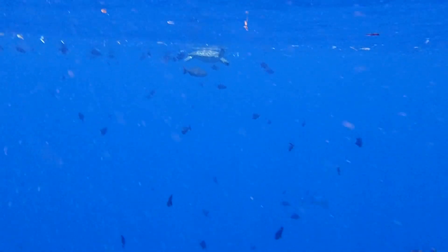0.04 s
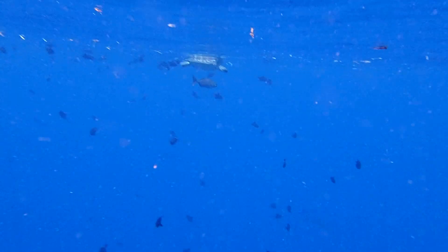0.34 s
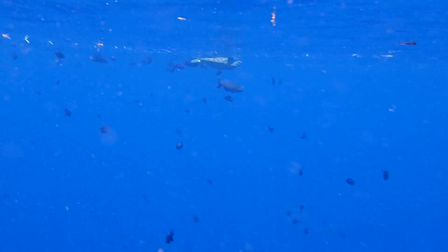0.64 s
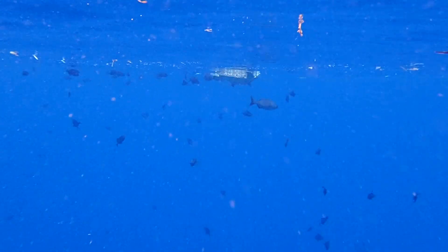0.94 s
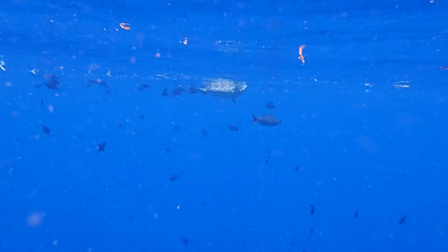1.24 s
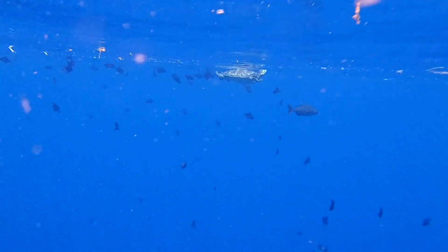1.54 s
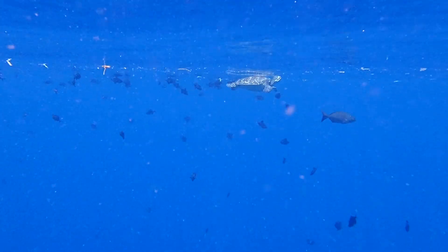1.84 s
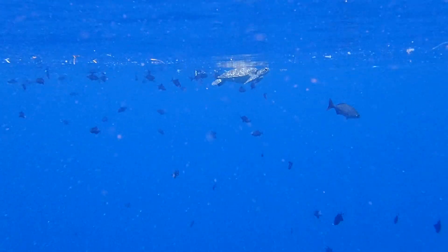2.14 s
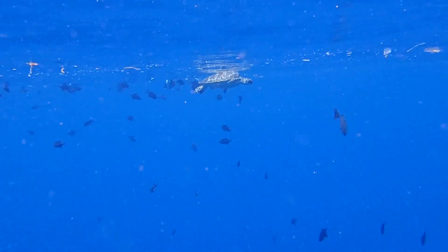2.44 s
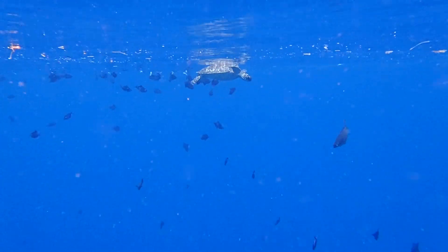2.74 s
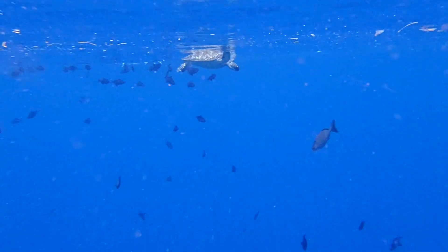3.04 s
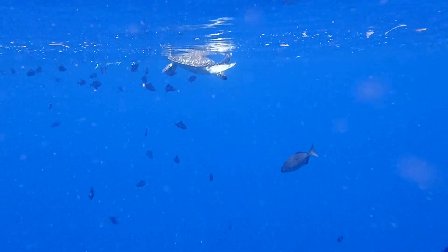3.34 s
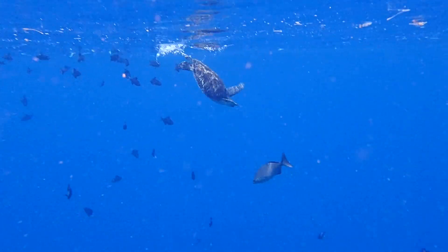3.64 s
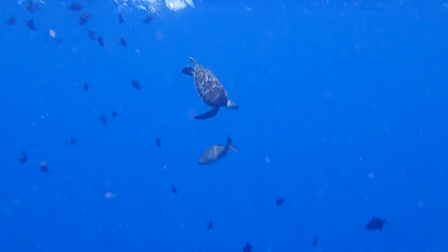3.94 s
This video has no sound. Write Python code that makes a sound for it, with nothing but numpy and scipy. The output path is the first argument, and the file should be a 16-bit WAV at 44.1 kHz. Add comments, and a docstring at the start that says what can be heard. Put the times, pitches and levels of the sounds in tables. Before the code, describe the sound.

Water rumbles and sloshes around a submerged microphone for four seconds, surging between left and right. Dull knocks cluster in the first second, strongest around 0.6 seconds, with small splashes and bubble blips. More thuds and low gulps come from 1.7 to 2.5 seconds and near 3 seconds. A few bubbles blip around 3.4 seconds. Tiny bright crackles and faint gurgling continue throughout.

```python
"""Swell and eddies rumble on the two microphone ports of a camera held just under the open sea.
Each port gets its own push; strong eddies gulp, the housing drones, and the hardest surges knock on it.
Behind that the surface gurgles, wavelets splash and a few bubbles blip, rising in pitch.
On top, tiny snaps ring the housing in bright crackles over a fine fizz."""
import sys
import numpy as np
from scipy import signal
from scipy.fft import rfft, irfft
from scipy.io import wavfile
from scipy.ndimage import uniform_filter1d, minimum_filter1d

SR = 44100
rng = np.random.default_rng(int(sys.argv[2]) if len(sys.argv) > 2 else 0)


def wrap_up_sound(samples):
    """Save the sound to the file named by the first command line argument, as 16-bit audio."""
    columns = np.atleast_2d(samples).T
    # keep every value between -1 and 1, then stretch to whole-number steps
    tamed = np.clip(columns, -1, 1)
    steps = np.round(tamed * 32767).astype(np.int16)
    wavfile.write(sys.argv[1], SR, steps)


N = 176400
T = np.arange(N) / SR

# Levels are relative: each layer adds its own trim. pan_db is left minus right.
# fizz of tiny bubbles: time_s, level_db
FIZZ_RIDE = [(0.07, -62), (0.18, -68.5), (0.4, -71), (0.58, -67), (0.68, -66.5), (0.8, -72), (1.12, -71.5),
             (1.29, -68.5), (1.44, -64), (1.57, -61), (1.64, -55.5), (1.74, -57), (1.83, -66.5),
             (1.97, -69.5), (2.15, -60), (2.33, -68), (2.47, -64), (2.72, -58.5), (2.85, -52),
             (2.99, -64.5), (3.06, -73.5), (3.15, -69), (3.27, -64), (3.43, -54), (3.62, -56), (3.98, -55)]
# the clearest crackles: start_s, level_db
CRACKLE_CUES = [(.0184, -17.5), (.033, -28), (.0707, -36), (.2515, -36), (.269, -37), (.2758, -34),
                (.345, -44), (.3744, -42), (.447, -41.5), (.4978, -33), (.5237, -37), (.6057, -44),
                (.8395, -38), (.8789, -43), (.9595, -32), (1.035, -47), (1.052, -32), (1.1955, -35),
                (1.2466, -40.5), (1.352, -40), (1.3723, -26), (1.429, -32.5), (1.4494, -20.5), (1.47, -37),
                (1.4995, -23), (1.537, -31), (1.573, -29), (1.624, -29.5), (1.707, -21.5), (1.735, -31.5),
                (1.7735, -24), (1.854, -35.5), (1.909, -27), (2.017, -39), (2.042, -38), (2.124, -36),
                (2.224, -33.5), (2.414, -25.5), (2.478, -34.5), (2.485, -31), (2.5565, -32.5), (2.665, -35),
                (2.6834, -23.5), (2.728, -35), (2.751, -34), (2.7975, -24.5), (2.86, -22), (2.8845, -26.5),
                (2.896, -30.5), (2.946, -38), (3.056, -37), (3.224, -34), (3.265, -35), (3.2995, -25.5),
                (3.343, -40), (3.397, -34), (3.406, -28), (3.435, -36), (3.4815, -16), (3.519, -27),
                (3.584, -24), (3.603, -25), (3.625, -32), (3.67, -37), (3.726, -30), (3.737, -31.5),
                (3.744, -39), (3.761, -37), (3.7885, -20), (3.822, -26.5), (3.842, -31), (3.851, -39),
                (3.886, -28), (3.895, -25), (3.911, -23.5), (3.9875, -22)]
# churning of the surface: time_s, level_db
GURGLE_RIDE = [(0.02, -54), (0.1, -60.5), (0.23, -66), (0.33, -64.5), (0.5, -64.5), (0.57, -63),
               (0.69, -64.5), (0.76, -62), (0.85, -56.5), (0.98, -62.5), (1.1, -62.5), (1.38, -59),
               (1.66, -55.5), (1.88, -61.5), (2.09, -58), (2.23, -61), (2.38, -62), (2.6, -62),
               (2.92, -58.5), (3.15, -70.5), (3.27, -59.5), (3.48, -58.5), (3.57, -55), (3.87, -57.5),
               (3.98, -54)]
# single bubbles: start_s, level_db, pitch_hz, pan_db
BUBBLE_CUES = [(.204, -19, 796, -20), (.584, -6, 450, 10), (.634, -15, 850, 4), (0.646, -22, 940, -5),
               (.683, -23, 815, 8), (0.9, -35.5, 1390, 3), (3.316, -38.5, 870, 5), (3.339, -24, 554, 1),
               (3.368, -27, 826, 1), (3.418, -27, 865, 0), (3.443, -9.5, 403, 0), (3.472, -23, 400, 2),
               (3.603, -27.5, 1070, 1), (3.647, -25, 780, 0)]
# wavelets breaking on the housing: start_s, length_s, swish_db, spray_db, pan_db
SPLASH_CUES = [(0.0, 0.054, -37.5, -46.5, 2), (0.204, 0.0069, -38, -42.5, -16),
               (0.597, 0.015, -27.5, -46, 23), (0.636, 0.043, -33, -63, -5), (0.659, 0.017, -38, -58, -4),
               (0.674, 0.034, -38, -53, 5), (0.705, 0.045, -39, -60, 21), (0.769, 0.017, -35, -51.5, 21),
               (0.859, 0.018, -39, -80, 5), (0.901, 0.03, -45, -79, 0), (0.972, 0.066, -45.5, -65, 11),
               (1.434, 0.038, -51, -68, 7), (1.584, 0.034, -44, -62, 6), (2.778, 0.027, -48, -48, 16),
               (2.833, 0.027, -47, -58, 6), (2.967, .025, -41.5, -45, 11), (3.6, 0.035, -44, -47, 5)]
# water knocking on the housing: hit_s, level_db, treble_db, pan_db
KNOCK_CUES = [(0.074, -6, -8, 1), (0.087, -8, -10, -30), (0.127, -0.5, -13, 11), (0.175, -1.5, -12, -21),
              (.207, -9, -18.5, -17.5), (0.258, -8, -30, -16.5), (0.316, -13, -28, -18),
              (.388, -13, -9.5, 34.5), (0.515, -8.5, -30, -20), (0.5535, 4, -6, -27), (0.608, -4, -26, 24),
              (0.6523, -11, -9, 11), (.663, 0, -13, 19), (0.6901, 2, -25, -11), (0.708, 1, -36, 27),
              (0.776, -9.5, -33.5, 26), (0.976, -11.5, -19.5, 16), (.998, -13.5, -26, 15),
              (1.009, -14.5, -27, 6.5), (1.124, -22, -7, 6.5), (1.721, -7, -14, 3.5), (1.737, -11.5, -5, 8),
              (1.763, -11.5, -14, -5), (1.7933, -10.5, -16, 15), (1.836, -16, -9, 33),
              (1.856, -15.5, -4.5, 31), (1.937, -15.5, -9, 14), (1.961, -7, -11, 35),
              (2.2038, -5.5, -15, -6), (2.213, -13, -6.5, 0), (2.2444, -11, -9.5, -21),
              (2.2526, -9, -14, -15), (2.269, -10.5, -10, -33.5), (2.5247, -9.5, -11.5, 28.5),
              (2.8609, -6, -11.5, 12), (2.868, -16, -12, 4), (2.9273, -9, -9, 22), (2.9963, -8, -11, 21.5),
              (3.002, -13, -5, 9.5), (3.034, -14.5, -12, 9), (3.0444, -9.5, -8, 10.5),
              (3.073, -6.5, -14, -24.5), (3.623, -16, -9, 14), (3.75, -9.5, -15, 29), (3.789, -16, -5, 14),
              (3.979, -4.5, -6, 3)]
# single strong eddies: start_s, length_s, first_hz, last_hz, level_db, pan_db
GULP_CUES = [(.035, 0.059, 145.5, 188.5, -5.5, -3.5), (.11, 0.13, 256, 167, -14, -2),
             (.36, 0.08, 191.3, 174, -8, 5), (.62, 0.065, 371.5, 337, -10.5, 13.5),
             (.93, 0.084, 269, 286, -10.5, -6.5), (1.1, 0.055, 175, 165, -15, -5.5),
             (1.67, 0.19, 88.8, 65.5, -11, 1), (2.13, 0.099, 107.3, 79, -9, 12),
             (2.228, 0.033, 135, 160, -11.5, 5), (2.24, 0.042, 293.7, 315, -4.5, -24),
             (2.265, 0.055, 436, 252, -13, -14), (2.31, 0.044, 224, 188, -10.5, 18),
             (2.362, 0.035, 173, 149, -8, 14), (2.49, 0.098, 146.3, 120, -10, 15.5),
             (2.829, 0.12, 58.3, 81.9, -3.5, -0.5), (2.96, 0.14, 213.8, 212.8, -11.5, 12.5),
             (3.272, 0.025, 189, 200, -16.5, 17), (3.53, 0.19, 50, 53, -9, -3.5)]
# housing drone, sloshing eddies and slow push of the swell: time_s, level_db, pan_db
HOLLOW_RIDE = [(0.0, -29, -7), (0.1, -32.5, 1), (0.12, -18.5, 19), (0.19, -30.5, -1), (0.3, -23, 9.5),
               (0.36, -31, -12.5), (0.39, -19, 6), (0.47, -39.5, 8), (0.52, -24.5, -11), (0.57, -26, 11),
               (0.65, -19.5, -1.5), (0.81, -33, 4.5), (1.15, -22, -5), (1.18, -24.5, 7), (1.21, -33, 9),
               (1.25, -24, 0), (1.36, -31, -1), (1.5, -31.5, 4.5), (1.73, -22.5, -2.5), (1.86, -22, 5.5),
               (1.9, -43, -2), (1.94, -23, 11), (2.04, -37, -4), (2.09, -19.5, 6.5), (2.14, -29.5, 14),
               (2.26, -17, -20), (2.34, -37, -3), (2.46, -30.5, -11.5), (2.51, -36.5, -3.5),
               (2.72, -30.5, 16.5), (2.74, -36, -1), (2.83, -23.5, 3.5), (3.0, -27.5, 2), (3.07, -23.5, -8),
               (3.19, -47, 1.5), (3.27, -37, 14), (3.31, -35, 4), (3.73, -21.5, -2.5), (3.91, -40.5, 1.5),
               (4.0, -29.5, -4)]
EDDY_RIDE = [(0.0, -51, -3), (0.04, -24, 6), (0.08, -17, -5), (0.22, -14, -13), (0.34, -27.5, 3.5),
             (0.39, -14.5, 10.5), (0.5, -22.5, -2), (0.56, -14, -44), (0.6, -17, 22), (0.7, -17.5, -8.5),
             (0.78, -21.5, 23), (0.82, -25.5, -16), (0.91, -23.5, 10), (0.96, -18.5, 4), (1.1, -21, -16),
             (1.12, -13, -6), (1.17, -27.5, 21), (1.2, -20, 14), (1.36, -29, -4.5), (1.47, -28, 21),
             (1.56, -24, 7), (1.77, -14.5, 4.5), (1.93, -20.5, 16), (1.96, -16.5, 22), (1.99, -32, 4),
             (2.17, -18.5, 12), (2.21, -18, -10.5), (2.27, -18.5, -11), (2.37, -22, 11.5), (2.44, -27, 7.5),
             (2.53, -14, 19), (2.61, -30.5, 15), (2.7, -17, 18.5), (2.75, -33, 8), (2.99, -14.5, 5.5),
             (3.1, -15, -5.5), (3.135, -32.5, -3.5), (3.2, -34, -9), (3.27, -33.5, 13), (3.35, -31.5, -1),
             (3.68, -17, 2), (3.75, -16.5, 17), (3.92, -34, -14), (3.98, -22.5, 4), (4.0, -23, -6)]
SWELL_RIDE = [(0.0, -9.5, -10), (0.09, -28, -5), (0.19, -22, -18), (0.48, -26, -2), (0.54, -11.5, -21),
              (0.61, -21.5, 1), (0.89, -24.5, 9), (0.98, -15.5, 20.5), (1.07, -22.5, -3.5),
              (1.27, -21.5, 3.5), (1.29, -22.5, 3), (1.38, -21, -11), (1.41, -20, 16), (1.65, -18.5, -7),
              (1.7, -12.5, 13), (1.78, -13, -7), (1.92, -27, 6.5), (1.97, -15, 29), (2.0, -23.5, -1),
              (2.06, -19.5, 12), (2.19, -15, -2.5), (2.29, -29.5, -5), (2.39, -29.5, 1), (2.45, -35, -22),
              (2.51, -16.5, 16.5), (2.58, -24, -1), (2.64, -16.5, 17.5), (2.8, -29, -1.5), (2.86, -11.5, 4),
              (2.9, -24.5, -3), (2.99, -16.5, 22.5), (3.07, -13.5, -16.5), (3.14, -34.5, 10),
              (3.2, -28, 14.5), (3.25, -17.5, 16), (3.4, -26, 3), (3.64, -11, 2), (3.66, -18, -27),
              (3.8, -13.5, 8.5), (3.89, -32.5, -5), (4.0, -7.5, 9.5)]

# EQ of the bright haze, the snaps and the ringing housing: frequency_hz, gain_db
HAZE_EQ = [(2000, -24), (3500, -25.5), (5000, -14.5), (5900, -1), (6600, -1), (7600, -9), (9200, -8.5),
           (10500, -20.5), (16000, -35)]
SNAP_EQ = [(2000, -31), (3800, -27.5), (4800, -11.5), (6500, -3), (8600, -4.5), (9600, -6.5), (10600, -24),
           (16000, -25)]
RING_EQ = [(1500, -63.5), (3500, -37.5), (4400, -15.5), (5000, -11.5), (5800, 3), (6600, 6), (7600, -6),
           (9000, -6.5), (10500, -27), (16000, -29.5)]
# EQ of the churning, the wavelets and the thuds: frequency_hz, gain_db
GURGLE_EQ = [(350, -18.5), (600, -10), (830, 5.5), (1200, -0.5), (1600, -3), (2100, -13), (2800, -31),
             (4000, -33), (8000, -57.5)]
SWISH_EQ = [(300, -22), (600, 4), (880, 7), (1250, 3), (1900, -14.5), (2300, -26), (2900, -44),
            (5000, -41.5), (9000, -61.5)]
KNOCK_EQ = [(40, -12.5), (150, -0.5), (330, 1), (500, -9), (800, -18), (1500, -31), (3000, -32.5),
            (5000, -39), (8500, -38.5), (11000, -50), (16000, -70)]
# EQ of the three rumble layers: frequency_hz, gain_db
HOLLOW_EQ = [(150, -35), (260, -8), (320, 0.5), (370, 0.5), (420, 1), (500, -13.5), (620, -29.5),
             (900, -50.5), (2000, -82)]
EDDY_EQ = [(50, -41), (100, -5.5), (135, 2), (190, 1), (260, -5.5), (320, -19.5), (450, -37.5),
           (800, -84.5)]
SWELL_EQ = [(10, -39), (25, -25.5), (40, -9), (62, -3.5), (85, 3), (120, -2), (160, -18.5), (260, -49),
            (500, -80)]


def amp(db):
    return 10 ** (np.asarray(db) / 20)


def unit_rms(x):
    return x / np.sqrt(np.mean(x ** 2, -1, keepdims=True) + 1e-20)


def ride(table, column=1):
    """A fader move: straight lines between the time points of a table."""
    rows = np.array(table)
    return np.interp(T, rows[:, 0], rows[:, column])


def eq_gain(eq, size):
    """Gain of an EQ curve at each FFT bin."""
    hz, db = np.transpose(eq)
    return amp(np.interp(np.log(np.fft.rfftfreq(size, 1 / SR) + 1), np.log(hz), db))


def pan(pan_db):
    """Left and right gains of mean power 1."""
    gains = amp(np.array([np.atleast_1d(pan_db), -np.atleast_1d(pan_db)]) / 2)
    return gains / np.sqrt(np.mean(gains ** 2, 0))


def place(mix, start_s, sound):
    part = mix[:, max(round(start_s * SR), 0):][:, :sound.shape[-1]]
    part += sound[..., :part.shape[1]]


def noise(eq):
    """Coloured noise, unrelated at the two ports."""
    return unit_rms(irfft(rfft(rng.standard_normal((2, N))) * eq_gain(eq, N), N))


def lumps(depth_db, rate_hz):
    """A randomly wobbling gain for each port; depth_db is its rms swing."""
    lowpass = np.exp(-(np.fft.rfftfreq(N, 1 / SR) / rate_hz) ** 2)
    wobble = unit_rms(irfft(rfft(rng.standard_normal((2, N))) * lowpass, N))
    return amp(depth_db * wobble)


def triggers(per_s, spread_db):
    """Randomly timed impulses, most small, a few louder."""
    sizes = amp(spread_db * np.minimum(rng.exponential(1, N), 3))
    return sizes * (rng.random(N) < per_s / SR)


def impulse(eq, size=4096, attack=1, lead_s=0):
    """Impulse response of an EQ, peak 1; attack 1 hits at once, less builds up during lead_s."""
    log_gain = np.log(eq_gain(eq, size))
    analytic = signal.hilbert(np.r_[log_gain, log_gain[-2:0:-1]])
    hit = np.fft.ifft(np.exp(analytic.real - 1j * attack * analytic.imag)).real
    return np.roll(hit, round(lead_s * SR)) / abs(hit).max()


def play(impulses, sound):
    """Fires a mono sound at every impulse of a stereo track."""
    return signal.oaconvolve(impulses, sound[None], axes=1)[:, :N]


def fizz(crowding=0.26, pivot_db=-58, bright_share=0.47):
    """Tiny bubbles: small snaps, leaning left and crowding as the level rises, over a fine haze."""
    level_db = ride(FIZZ_RIDE)
    density = amp(crowding * (level_db - pivot_db))
    clicks = triggers(per_s=120 * density, spread_db=2) / np.sqrt(density)  # busier, at equal power
    clicks = clicks * rng.choice([-1, 1], N) * pan(5 * rng.standard_normal(N))
    bright = rng.random(N) < bright_share
    spray = unit_rms(play(clicks * ~bright, impulse(RING_EQ)) + play(clicks * bright, impulse(SNAP_EQ)))
    haze = unit_rms(noise(HAZE_EQ) * lumps(depth_db=4, rate_hz=90)[0])
    return amp(level_db) * (amp(2.5) * pan(18.5) * spray + amp(1.5) * haze)


def crackles(trim_db=0.5, detune=0.02, lean_db=8, pan_spread_db=3, tail_db=-28, tail_s=0.0035):
    """Tiny snaps ring the housing for an instant, each at its own pitch, with a faint scattered tail."""
    out, t = np.zeros((2, N)), np.arange(1024) / SR
    for start_s, level_db in CRACKLE_CUES:
        pitch, side = rng.standard_normal(2)
        ring = impulse(np.array(RING_EQ) * [np.exp(detune * pitch), 1], size=1024)
        snap = amp(tail_db) * rng.standard_normal((2, len(t))) * np.exp(-t / tail_s)
        snap[:, 0] = 1  # the direct hit
        gain = amp(level_db + trim_db) * pan(lean_db + pan_spread_db * side)
        place(out, start_s, gain * play(snap, ring))
    return out


def through_housing(x, lag_s=4.5e-5):
    """Sound in the housing reaches the left port a little after the right one."""
    delay = np.exp(-2j * np.pi * np.fft.rfftfreq(N, 1 / SR) * lag_s)
    return np.array([irfft(rfft(x[0]) * delay, N), x[1]])


def gurgle(trim_db=1, bleed=0.46):
    """The surface churns in quick uneven lumps, partly shared by the ports."""
    churn = noise(GURGLE_EQ) * lumps(depth_db=3, rate_hz=60)
    return unit_rms(churn + bleed * churn[::-1]) * amp(trim_db + ride(GURGLE_RIDE))


def blip(hz, decay_s, rise_s=0.00071, chirp_per_s=2.5):
    """One bubble rings for a few cycles and rises in pitch."""
    t = np.arange(2048) / SR
    envelope = (1 - np.exp(-t / rise_s)) * np.exp(-t / decay_s)
    return envelope / envelope.max() * np.sin(2 * np.pi * hz * t * (1 + chirp_per_s * t))


def burble(trim_db=8, low_hz=690, high_hz=1750, pitches=24, tilt_db_per_octave=-5):
    """A swarm of small bubbles that swells steeply with the churning."""
    births = triggers(per_s=320, spread_db=2.5) * pan(8 * rng.standard_normal(N))
    pitch_index = rng.integers(0, pitches, N)
    swarm = np.zeros((2, N))
    for k, hz in enumerate(np.geomspace(low_hz, high_hz, pitches)):
        grain = amp(tilt_db_per_octave * np.log2(hz / low_hz)) * blip(hz, decay_s=0.64 / hz)
        swarm += play(births * (pitch_index == k), grain)
    expansion, pivot_db = 2.2, -51.5
    level_db = pivot_db + expansion * (ride(GURGLE_RIDE) - pivot_db)
    return unit_rms(swarm) * amp(trim_db + level_db)


def bubbles(trim_db=-6):
    """The larger bubbles ring out one by one."""
    out = np.zeros((2, N))
    for start_s, level_db, pitch_hz, pan_db in BUBBLE_CUES:
        place(out, start_s, amp(level_db + trim_db) * pan(pan_db) * blip(pitch_hz, decay_s=0.0045))
    return out


def splashes(spray_trim_db=-1, rise_s=0.012, release_s=0.0042):
    """Wavelets break on the housing: a dense, grainy swish with bright spray on top."""
    swish, spray = np.zeros((2, N)), np.zeros((2, N))
    for start_s, length_s, swish_db, spray_db, pan_db in SPLASH_CUES:
        rise = np.clip((T - start_s) / rise_s, 0, 1)
        release = np.exp(-np.maximum(T - start_s - length_s, 0) / release_s)
        envelope = pan(pan_db) * rise * release
        swish += amp(swish_db) * envelope
        spray += amp(spray_db + spray_trim_db) * envelope
    grain = unit_rms(lumps(depth_db=8.5, rate_hz=200))
    return grain * (swish * noise(SWISH_EQ) + spray * noise(SNAP_EQ))


def knocks(trim_db=-4, lead_s=0.012, uneven_db=3):
    """Surges knock on the housing: stuttering thuds, each with its own tone, inside a wet crunch."""
    stutter_per_s, stutter_db, stutter_decay_s = 520, -10.5, 0.004
    crunch_db, crunch_rise_s, crunch_decay_s = -35.5, 0.004, 0.011
    thuds, crunch = np.zeros((2, N)), np.zeros((2, N))
    t, hz = np.arange(4096) / SR, np.geomspace(40, 16000, 32)
    eq_hz, eq_db = np.transpose(KNOCK_EQ)
    body_db = np.interp(np.log(hz), np.log(eq_hz), eq_db)
    treble_shelf = np.interp(hz, [1600, 3000], [0, 1])
    envelope = np.exp(np.minimum((t - lead_s) / crunch_rise_s, (lead_s - t) / crunch_decay_s))
    for hit_s, level_db, treble_db, pan_db in KNOCK_CUES:
        gain = amp(level_db + trim_db) * pan(pan_db)
        tone_db = body_db + treble_db * treble_shelf + uneven_db * rng.standard_normal(len(hz))
        thud = impulse(np.c_[hz, tone_db], attack=0.77, lead_s=lead_s)
        stutter = rng.standard_normal(len(t)) * (rng.random(len(t)) < stutter_per_s / SR)
        stutter *= amp(stutter_db) * np.exp(-t / stutter_decay_s)
        stutter[0] = 1  # the main hit
        place(thuds, hit_s - lead_s, gain * signal.fftconvolve(stutter, thud))
        place(crunch, hit_s - lead_s, gain * amp(crunch_db) * envelope)
    return thuds + crunch * noise(GURGLE_EQ)


def gulps(trim_db=-5.5, waver=0.12):
    """A strong eddy passes a port: a short low tone that swells, glides and wavers."""
    out = np.zeros((2, N))
    for start_s, length_s, first_hz, last_hz, level_db, pan_db in GULP_CUES:
        progress = np.linspace(0, 1, round(length_s * SR))
        cycles = np.cumsum(first_hz + (last_hz - first_hz) * progress) / SR
        detune, phase = rng.uniform(-1, 1, (2, 8, 2, 1))  # eight beating voices per port
        tone = np.sin(2 * np.pi * cycles * (1 + waver * detune) + np.pi * phase).sum(0)
        gulp = unit_rms(tone * np.sin(np.pi * progress))
        place(out, start_s, amp(level_db + trim_db) * pan(pan_db) * gulp)
    return out


def flow(table, eq, trim_db, bleed, lump_db, lump_hz, steady_s):
    """Turbulent pressure: lumpy, partly shared by the ports, its level and pan riding the surges."""
    pressure = noise(eq)
    pressure = pressure + bleed * pressure[::-1]
    width = int(steady_s * SR)
    power = uniform_filter1d(uniform_filter1d(pressure ** 2, width), width)
    steady = pressure / np.sqrt(abs(power) + 1e-9)  # irons out the noise's own slow swings
    lumpy = unit_rms(steady * lumps(lump_db, lump_hz))
    return lumpy * amp(trim_db + ride(table)) * pan(ride(table, column=2))


def rumble():
    """Deep swell and sloshing eddies press on the ports while the housing drones in the flow."""
    swell = flow(SWELL_RIDE, SWELL_EQ, trim_db=2.5, bleed=0.093, lump_db=1, lump_hz=25, steady_s=0.038)
    eddies = flow(EDDY_RIDE, EDDY_EQ, trim_db=2.5, bleed=0.24, lump_db=3, lump_hz=42, steady_s=0.023)
    drone = flow(HOLLOW_RIDE, HOLLOW_EQ, trim_db=3.5, bleed=0.15, lump_db=3.5, lump_hz=50,
                 steady_s=0.096)
    return swell + eddies + drone


def scene(fade_s=0.00063):
    """The body of the water, topped with the sparkle that comes through the housing."""
    fade = np.clip(np.minimum(T, T[::-1]) / fade_s, 0, 1)
    water = rumble() + gulps() + gurgle() + burble() + splashes() + knocks() + bubbles()
    return fade * (water + through_housing(crackles() + fizz()))


def record(dry, ceiling=0.71, smooth_s=0.0021, cutoff_hz=16300):
    """A fast limiter on each port, then a steep high cut."""
    width = int(smooth_s * SR)
    needed_gain = np.minimum(1, ceiling / (abs(dry) + 1e-9))
    held_gain = minimum_filter1d(needed_gain, 2 * width)
    limited = dry * uniform_filter1d(uniform_filter1d(held_gain, width), width)
    high_cut = signal.firwin(511, cutoff_hz, window=("kaiser", 9), fs=SR)
    return signal.oaconvolve(limited, high_cut[None], "same")


dry = scene()
out = record(dry)
wrap_up_sound(out)
```